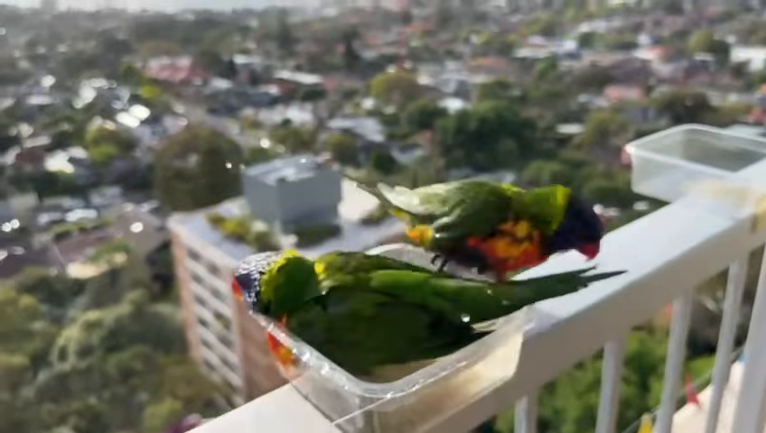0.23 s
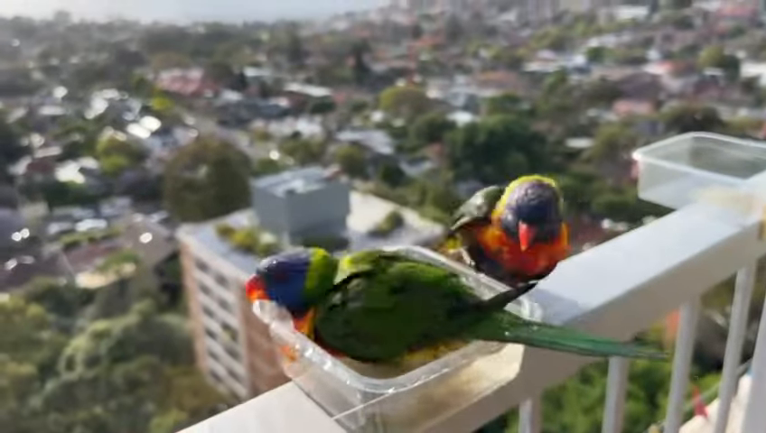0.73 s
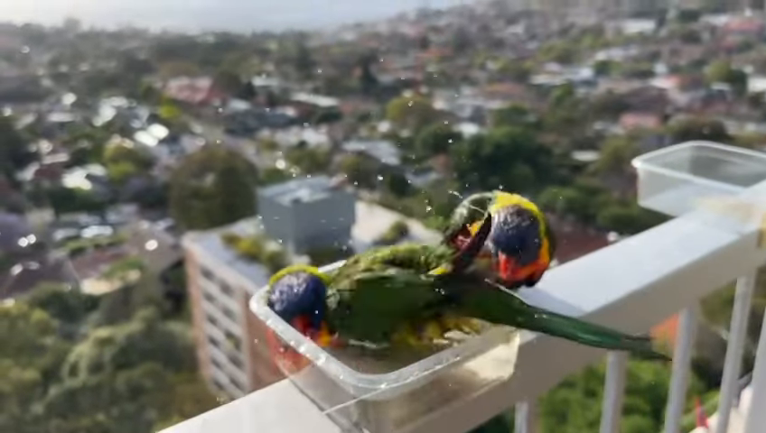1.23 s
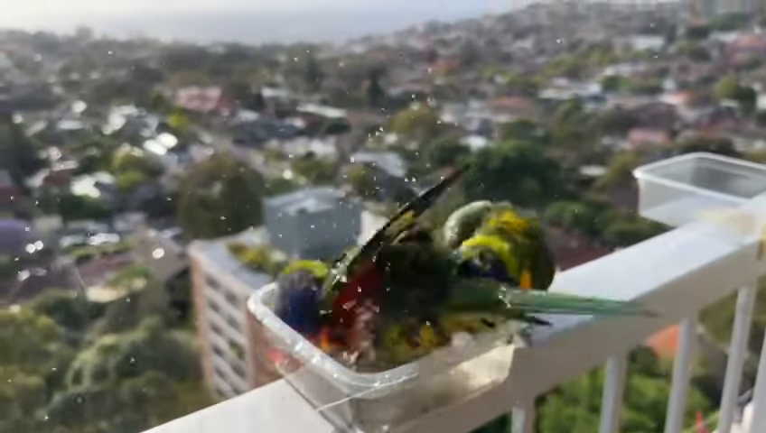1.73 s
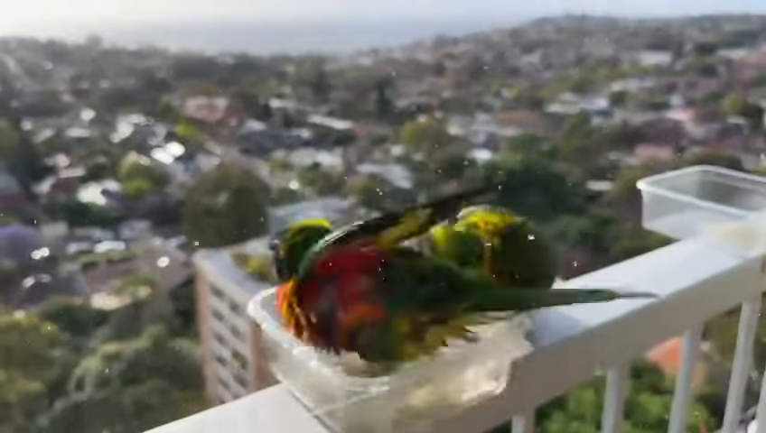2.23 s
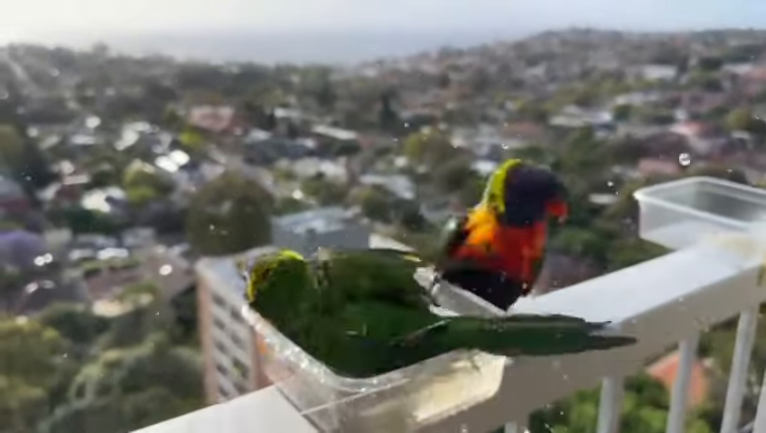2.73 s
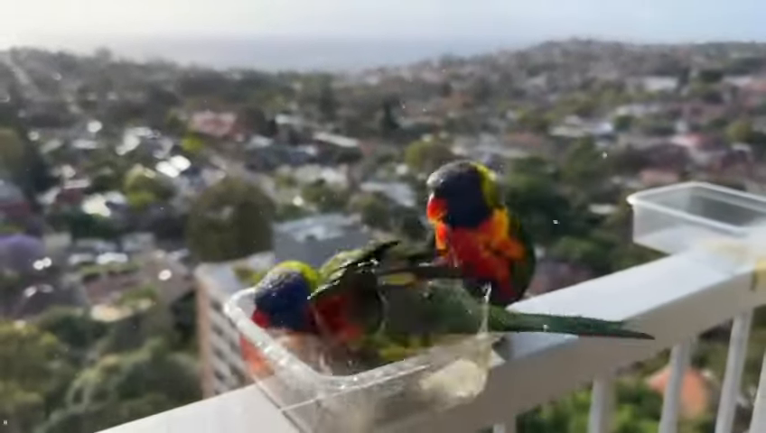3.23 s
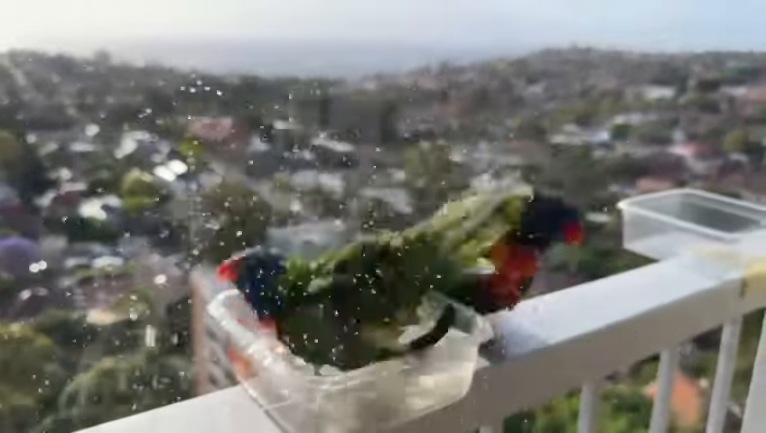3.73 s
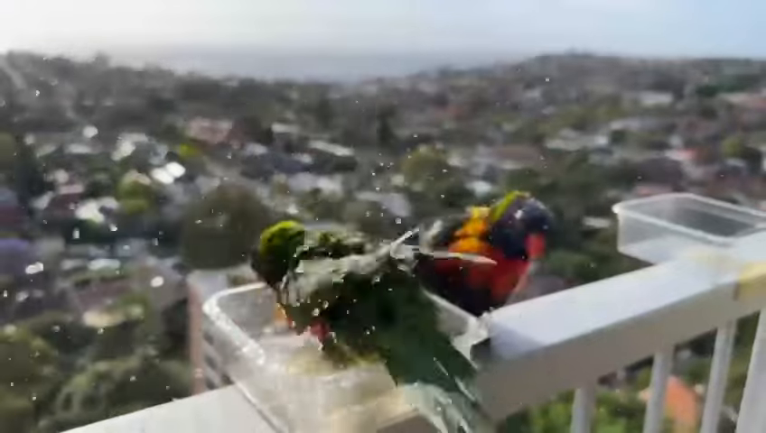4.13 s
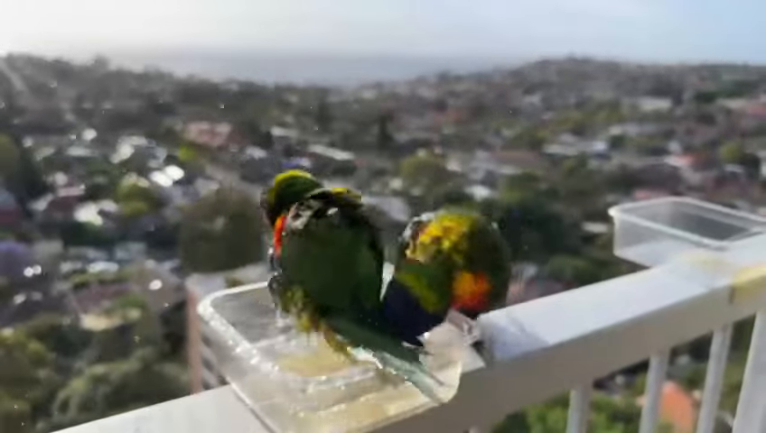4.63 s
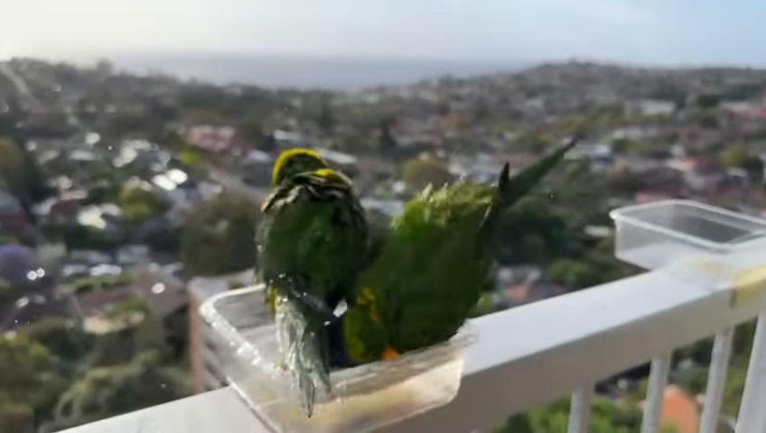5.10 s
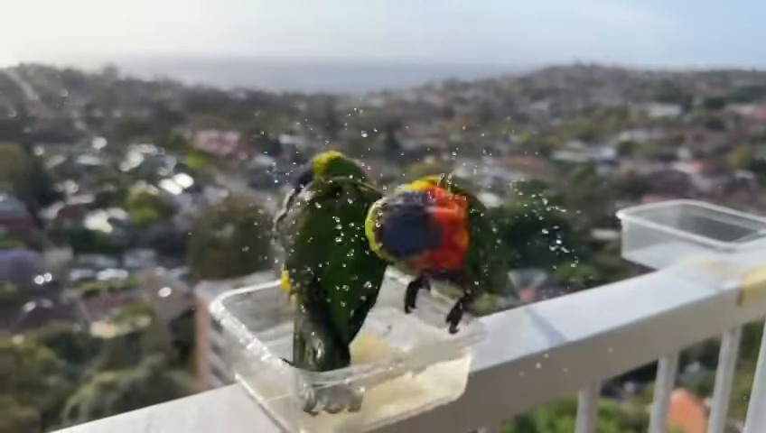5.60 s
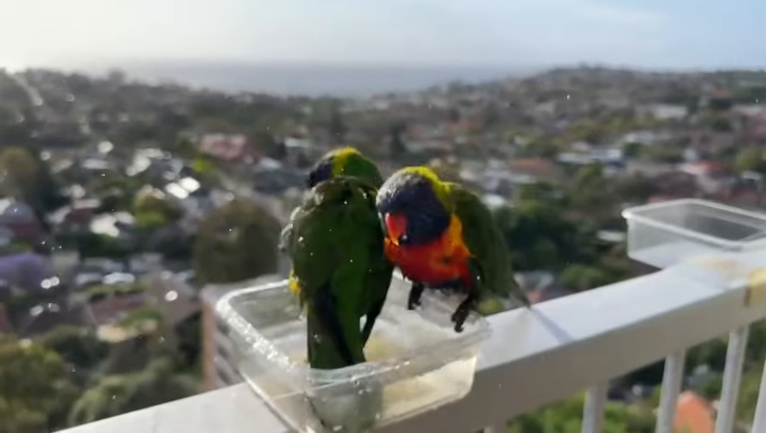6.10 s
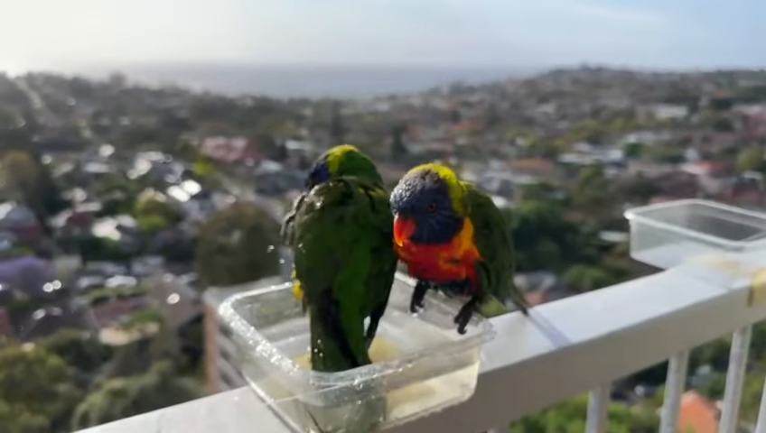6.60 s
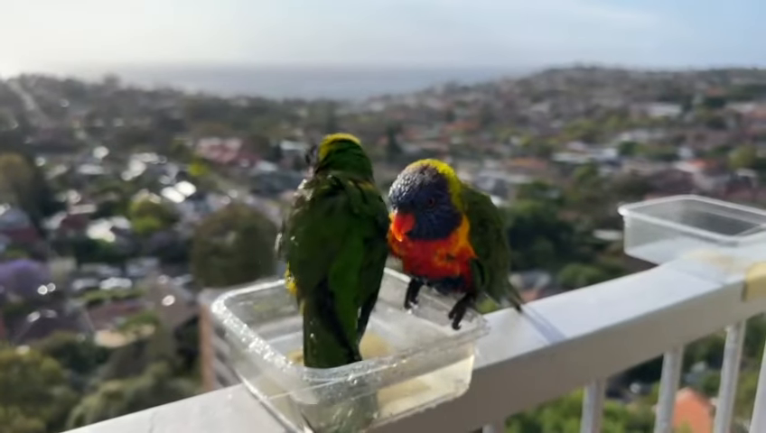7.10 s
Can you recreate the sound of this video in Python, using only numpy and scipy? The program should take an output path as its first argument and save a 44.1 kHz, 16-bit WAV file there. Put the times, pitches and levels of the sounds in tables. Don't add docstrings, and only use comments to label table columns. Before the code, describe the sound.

On an open balcony, parrots bathing in a thin plastic tub give soft raspy chirps, wing slaps and watery patter, then a dense chain of harsh screeches. A brief lower scolding comes after, then tub thuds, drops and gusts bumping the microphone. Faint birds whistle far off, and a final sharp call ends it. Close phone pickup, low distant hum, only a faint tail from nearby walls.

```python
import sys
import numpy as np
from scipy import signal
from scipy.fft import rfft, irfft
from scipy.io import wavfile
from scipy.ndimage import uniform_filter1d, minimum_filter1d

SR = 44100
rng = np.random.default_rng(int(sys.argv[2]) if len(sys.argv) > 2 else 0)


def master(y):
    cut = np.clip(np.atleast_2d(y).T, -1, 1)
    pcm = np.round(cut * 32767)
    wavfile.write(sys.argv[1], SR, pcm.astype(np.int16))


def level_to_linear(level):
    exponent = np.asarray(level, float) / 20
    return 10 ** exponent


N = 324135
T = np.arange(N) / SR

# start_s, length_s, second_partial_db, higher_partials_db, left_minus_right_db
PHRASES = [(.14, .15, -26, -11.5, 2.5), (0.38, .15, -3.5, -17, -0.5), (0.792, .154, -4, -6, -3),
           (.949, 0.053, -15, -15, -8), (1.424, 0.066, -8.5, -16, 1), (1.508, 0.28, -12.5, -17, -0.5),
           (1.689, 0.069, -18.5, -20.5, -1), (2.088, .138, -8.5, -27, -1), (2.237, 0.17, -13.5, -14.5, 4),
           (2.656, .23, -13.5, -13, 3.5), (2.915, .165, -2.5, 0.5, -3), (3.083, .095, -5, -5.5, -0.5),
           (3.174, .207, -5, -3, -2), (3.556, 0.066, -12, -13.5, -3), (3.612, 0.047, -16, -19, -4.5),
           (3.659, 0.084, -9, -45, -4.5), (4.243, .048, -4.5, -7.5, -2), (4.295, .025, -23, -14, -9),
           (4.324, 0.046, -5.5, -11, -1), (4.381, .026, -8, -16, -2), (4.498, .032, -9.5, -9, 4),
           (4.529, .2, -28, -28, 1.5), (7.207, 0.025, -13, -3, 4), (7.237, .14, -9, -10, 5.5)]


def curve(table):
    s, *columns = np.transpose(table)
    return [np.interp(T, s, c) for c in columns]


def unit(x):
    return x / np.sqrt(np.mean(x ** 2, axis=-1, keepdims=True))


def band(x, lo_hz, hi_hz, order=2):
    edges_hz = [lo_hz, min(hi_hz, .45 * SR)]
    return signal.sosfilt(signal.butter(order, edges_hz, "band", fs=SR, output="sos"), x)


def walk(rate_hz):
    hold = max(int(SR / rate_hz), 2)
    steps = np.repeat(rng.standard_normal(N // hold + 1), hold)
    slewed = uniform_filter1d(uniform_filter1d(steps, hold), hold)
    return unit(slewed[:N])


def pair(mid, side, share):
    return np.array([mid + share * side, mid - share * side])


def swell(s, length_s):
    return np.exp(-(2 * (T - s) / length_s) ** 2)


def hum():
    # time_s, level_db
    drone_level = [(0, -24), (.45, -27.5), (.9, -22), (1.15, -26.5), (1.37, -41), (1.62, -23), (2, -27.5),
                   (2.2, -35), (2.7, -31), (2.88, -46), (3.05, -30.5), (3.6, -35.5), (3.8, -46.5),
                   (4.15, -39), (4.4, -51.5), (4.7, -37), (5.1, -42.5), (5.5, -40.5)]
    # time_s, pitch_hz
    drone_pitch = [(2.3, 54.6), (5, 61.15)]
    hz = curve(drone_pitch)[0] * (1 + 0.012 * walk(16))
    level = level_to_linear(curve(drone_level)[0] + 0.48 * walk(3.3))
    return np.sqrt(2) * level * np.sin(2 * np.pi * np.cumsum(hz) / SR)


def town():
    # frequency_hz, level_db per Hz
    colour = [(18, -33), (30, 9.5), (75, -3.5), (187, -12.5), (277, -13), (432, -19.5), (953, -19.5),
              (1900, -32.5), (2210, -31.5), (4520, -50), (7230, -48), (11000, -100), (14300, -130),
              (22000, -120)]
    # time_s, level_db
    loudness = [(0, -41.5), (2.2, -44.5), (4.2, -49.5), (5.5, -46), (7.35, -45.5)]
    murmur = 0
    colour_hz, colour_db = np.transpose(colour)
    for hz in 40 * 2 ** np.arange(0, 8.1, .5):
        noise = rng.standard_normal((2, N))
        mid, side = unit(band(noise, hz * 0.812, hz * 1.138)) * np.sqrt(hz)
        db = np.interp(np.log(hz), np.log(colour_hz), colour_db) + 0.11 * walk(2.2)
        murmur = murmur + level_to_linear(db) * pair(mid, side, np.clip((hz / 1300) ** .5, 0, .8))
    return murmur / np.std(band(murmur, 250, 800)) * level_to_linear(curve(loudness)[0])


def wind():
    # middle_s, length_s, level_db
    gusts = [(1.442, 0.23, -31.5), (2.5, 0.074, -41.5), (5.192, 0.25, -32.5), (5.501, 0.29, -37.5),
             (5.76, 0.13, -34), (5.869, 0.049, -27), (6.124, 0.092, -37.5), (6.404, 0.22, -38),
             (6.534, 0.082, -40), (7.231, .02, -26.5), (7.303, 0.1, -21)]
    # time_s, level_db
    breeze = [
        (0, -49),
        (4.3, -52),
        (5.5, -46),
    ]
    rush_db = 17.5
    eddies = unit(band(band(rng.standard_normal((2, N)), 60, 100, order=1), 22, 270))
    blow = level_to_linear(curve(breeze)[0]) + sum(level_to_linear(db) * swell(s, length) for s, length, db in gusts)
    rush = level_to_linear(rush_db) * blow * unit(band(rng.standard_normal((2, N)), 100, 190))
    return pair(*(eddies + rush), 0.27) * blow * level_to_linear(2 * walk(18))


def splashes():
    # time_s, level_db
    spray = [(0.05, -55.5), (0.62, -69), (0.69, -61), (1.2, -54), (1.33, -57.5), (2.02, -59.5),
             (2.44, -48.5), (2.75, -50), (3.47, -52), (3.96, -56.5), (4.13, -65.5), (4.79, -63.5),
             (4.85, -58), (5.05, -78), (5.3, -63.5), (5.8, -100), (6.75, -99), (6.95, -61.5), (7.15, -68)]
    # start_s, peak_db, tub_knock_db
    slaps = [(0.2277, -33, -31.5), (0.7302, -35.5, -44), (1.092, -34.5, -47), (1.395, -41.5, -46),
             (1.7932, -27.5, -32), (1.8, -35, -29), (1.92, -27, -23), (1.929, -40, -35), (2.0468, -25, -27),
             (2.912, -42.5, -25), (3.7317, -31.5, -55), (3.868, -37, -27), (3.9316, -32.5, -33),
             (4.0022, -34, -30), (4.011, -43, -35), (4.104, -56.5, -57.5), (4.17, -37, -40),
             (4.1886, -39.5, -53), (4.3362, -40, -14.5), (4.481, -43.5, -31), (4.8781, -47, -20),
             (4.973, -26, -30), (4.9796, -43.5, -34.5), (5.0398, -46.5, -13.5)]
    # time_s, peak_db
    ticks = [
        (1.504, -26),
        (2.3294, -24),
        (3.4135, -38),
        (3.7372, -35),
        (4.8254, -50),
        (4.865, -35.5),
        (4.9457, -51),
        (4.9457, -42),
        (6.1376, -53),
        (6.5404, -55),
    ]
    # middle_s, length_s, level_db
    swishes = [
        (0.247, 0.025, -44.5),
        (1.975, 0.029, -41),
        (2.177, 0.024, -36.5),
        (2.376, 0.048, -28.5),
        (2.914, .012, -40.5),
        (3.858, 0.046, -65),
        (4.954, 0.018, -53),
        (5.646, 0.028, -44),
    ]
    # frequency_hz, width_hz, level_db
    tub_modes = [(1240, 457, 9), (1900, 27.3, 3.5), (4000, 4400, -15), (437, 195, -15)]
    knock_rise_s, fizz_db = 0.0029, -9
    crack, knock = np.zeros(N), np.zeros(N)
    u = T[:SR // 5]
    for s, db, knock_db in slaps:
        at = int(s * SR)
        contact, drip = level_to_linear(-60 * u / 0.014), level_to_linear(-14 - 60 * u / 0.0823)
        crack[at:at + len(u)] += level_to_linear(db - 6.5) * (contact + drip)
        knock[at:at + len(u)] += level_to_linear(knock_db + 4.5) * level_to_linear(-60 * u / 0.017) * (1 - np.exp(-u / knock_rise_s))
    for s, db in ticks:
        crack += level_to_linear(db - 6 - 60 * np.abs(T - s) / 0.0064)
    for s, length, db in swishes:
        crack += level_to_linear(db) * swell(s, length)
    drops = rng.standard_normal((2, N)) * level_to_linear(2.9 * rng.exponential(size=N))
    hiss = unit(band(drops, 1900, 16000) + level_to_linear(fizz_db) * band(drops, 8000, 13000))
    knocks = knock * rng.standard_normal(N)
    tub = sum(level_to_linear(db + 2.0) * band(knocks, hz - width / 2, hz + width / 2, order=1)
              for hz, width, db in tub_modes)
    patter = level_to_linear(curve(spray)[0] + 2.2 * walk(14))
    return pair(hiss[0], hiss[1], 0.54) * (crack + patter) + tub


def call_notes():
    # start_s, start_hz, end_hz, level_db
    chatter = [(.14, 1819, 1789, -47.5), (.198, 1844, 1826, -41.5), (.383, 1879, 1863, -38.5),
               (.4, 1860, 1879, -38.5), (.45, 1874, 2001, -38.5), (.495, 2253, 2106, -40),
               (.795, 2424, 2388, -24.5), (.819, 2106, 2050, -21), (.827, 2108, 2075, -32.5),
               (.865, 2238, 2377, -29.5), (.887, 2027, 1956, -29.5), (.915, 2273, 2262, -32),
               (.949, 1768, 1610, -37), (1.424, 1765, 2237, -38.5), (1.442, 2221, 2200, -31.5),
               (1.454, 1973, 1744, -33), (1.466, 1739, 1872, -37.5), (1.5, 2153, 1989, -28.5),
               (1.512, 1971, 1879, -28), (1.544, 1988, 1843, -32), (1.614, 1825, 1820, -35.5),
               (1.688, 1924, 2002, -22.5), (1.706, 2055, 2334, -21), (1.718, 2352, 2615, -27),
               (1.73, 2154, 1609, -34), (2.09, 2010, 1970, -39), (2.14, 2109, 2017, -36.5),
               (2.168, 2154, 2042, -33), (2.186, 2061, 2458, -31), (2.208, 2360, 2140, -36.5),
               (2.236, 1901, 1952, -31), (2.292, 1841, 2013, -36), (2.335, 1901, 2113, -30.5),
               (2.664, 1636, 2040, -38.5), (2.692, 1991, 1832, -33), (2.742, 1846, 2202, -35),
               (2.762, 1810, 1757, -43), (2.794, 1598, 1548, -39), (2.817, 1900, 1765, -34.5),
               (2.834, 1579, 1561, -36), (2.852, 1854, 1803, -32.5), (2.865, 1642, 1518, -39.5)]
    screech = [(2.92, 2456, 2794, -19.5), (2.938, 2391, 2435, -18), (2.944, 2549, 2573, -19),
               (2.986, 2728, 3136, -18.5), (3.004, 2463, 2606, -19.5), (3.024, 2429, 2744, -15.5),
               (3.038, 2883, 2977, -15.5), (3.08, 2511, 2905, -20), (3.1, 2421, 2354, -18),
               (3.129, 2623, 2536, -16), (3.175, 2711, 2589, -17.5), (3.227, 2810, 3102, -17.5),
               (3.236, 3110, 2963, -18.5), (3.243, 2700, 2630, -17.5), (3.269, 2668, 2951, -15),
               (3.281, 2945, 2660, -14.5), (3.291, 2498, 2405, -18.5), (3.318, 2940, 2897, -25),
               (3.332, 2655, 2625, -20), (3.358, 2684, 2803, -21), (3.548, 1701, 1752, -28),
               (3.578, 1804, 1822, -24.5), (3.607, 2819, 3189, -20.5), (3.62, 2614, 2700, -14),
               (3.63, 2717, 2740, -14), (3.648, 2769, 2904, -17), (3.659, 3804, 3805, -10),
               (3.667, 3814, 3779, -10.5), (3.678, 3722, 3730, -24.5), (3.692, 2294, 2577, -21.5),
               (3.697, 2602, 2342, -21.5), (3.701, 3603, 3716, -16), (3.724, 3438, 3308, -32),
               (7.201, 2121, 2397, -23.5), (7.237, 2621, 2437, -17.5), (7.269, 2439, 2478, -19),
               (7.312, 2332, 2065, -17)]
    scold = [(4.248, 1822, 1869, -35.5), (4.282, 1900, 1580, -33.5), (4.296, 3650, 3052, -31),
             (4.322, 1770, 1658, -35), (4.339, 1950, 1827, -28), (4.35, 1906, 2094, -26.5),
             (4.377, 2084, 1930, -30), (4.389, 1912, 1443, -41), (4.494, 1601, 2254, -42.5),
             (4.507, 2317, 2724, -24), (4.527, 2266, 2225, -21), (4.533, 2203, 2083, -22),
             (4.546, 2071, 2016, -23.5), (4.571, 2224, 2310, -17.5), (4.588, 1996, 1978, -24),
             (4.607, 1940, 1799, -25), (4.63, 1933, 1646, -32.5), (4.664, 1773, 1854, -33),
             (4.7, 1730, 1804, -41)]
    scooped = [
        .795,
        3.548,
    ]
    scoop_s, scoop_share, scoop_db = 0.0093, .78, -2
    chain, rows = sorted(chatter + screech + scold), []
    for (s, hz0, hz1, db), (following, *_) in zip(chain, chain[1:] + [(np.inf,)]):
        phrase_ends = [a + length for a, length, *_ in PHRASES if a < s + .009]
        stop = min(following, phrase_ends[-1])
        if np.abs(s - np.array(scooped)).min() < .005:
            rows.append((s, scoop_s, scoop_share * hz0, hz0, db + scoop_db))
            s += scoop_s
        rows.append((s, stop - s, hz0, hz1, db))
    return rows


def syrinx(notes, edge_s):
    release_s = 0.012
    hz, gain, end = np.full(N, 2000.), np.zeros(N), 0
    for (s, length, hz0, hz1, db), (following, *_) in zip(notes, notes[1:] + notes[:1]):
        on = (T >= s) & (T < s + length)
        u = T[on] - s
        hz[on] = hz0 + (hz1 - hz0) * u / length
        rise = .3 + u / edge_s if s - end < .015 else .15 + u / .01
        joined = 0 < following - s < length + .004
        fall = 0.59 + (length - u) / edge_s if joined else (length - u) / release_s
        gain[on] = level_to_linear(db) * np.clip(np.minimum(rise, fall), 0, 1)
        end = s + length
    return uniform_filter1d(hz, size=80), uniform_filter1d(gain, size=50)


def period_doubling(hz, blur):
    # start_s, length_s, half_lines_db re note, lowest_line_extra_db
    doubled = [(0.214, 0.06, -8, 8), (0.383, 0.16, -12, -3), (1.699, 0.046, -12, 5.5), (2.09, 0.1, -8, -6),
               (2.168, 0.057, 1.5, 5), (2.334, 0.091, -11, 2.5), (2.68, .09, -14.5, -10),
               (2.917, 0.069, -25, -10), (2.981, 0.0061, 1.5, -15.5), (3.171, 0.051, -1, -4.5),
               (3.214, .018, -8, -2.5), (3.319, 0.025, -8, -4.5), (3.538, 0.073, 1, -12),
               (3.612, 0.045, -5, -1.5), (4.32, 0.063, -19, 5.5), (4.493, 0.015, -2.5, 9),
               (4.666, .065, -10.5, -19)]
    half_db = -45 + 28.5 * blur
    lowest_db = np.interp(hz, [1750, 2050], [-10, 0])
    for s, length, db, extra_db in doubled:
        on = (T >= s) & (T < s + length)
        half_db[on], lowest_db[on] = db, extra_db
    return half_db, lowest_db


def voice_catches(gain):
    # middle_s, length_s, dip_db, crack_db
    catches = [(0.215, 0.0063, -9, -65), (0.823, .005, -11.5, -42), (0.866, .004, -13, -43),
               (0.89, 0.003, -9, -50), (0.907, 0.0031, -9, -57), (2.685, 0.0048, -12.5, -58),
               (2.733, 0.0098, -10, -60), (2.819, .004, -11.5, -53.5), (2.875, .003, -6.5, -60),
               (2.929, 0.0034, -10, -28.5), (2.976, 0.0056, -8.5, -24), (3.002, 0.0018, -11.5, -32.5),
               (3.031, 0.004, -4.5, -32.5), (3.074, 0.012, -15, -23), (3.127, 0.0022, -8, -19.5),
               (3.175, 0.0079, -17, -30), (3.238, 0.0047, -4, -38), (3.28, 0.0019, -8, -46),
               (3.313, 0.011, -10, -44.5), (3.605, .004, -1.5, -25), (3.623, 0.00096, -3, -41),
               (3.6566, .002, -9, -37.5), (3.678, 0.0079, -26.5, -55), (3.724, 0.0034, -13.5, -54),
               (4.527, 0.0038, 6, -42.5), (4.534, 0.0059, -5, -46), (4.567, 0.0027, -12, -31),
               (4.585, 0.0069, -19, -48), (4.603, 0.0093, -19, -57), (4.625, 0.0053, -11, -55),
               (7.261, 0.0046, -4.5, -45), (7.318, 0.0042, -14, -45)]
    crack = 0
    for s, length, dip_db, crack_db in catches:
        catch = swell(s, length)
        gain = gain * level_to_linear(dip_db * catch)
        crack = crack + level_to_linear(crack_db) * catch
    return gain, crack


def trill(gain, wobble):
    # start_s, length_s, rolls per s, pitch swing share, dip_db
    trills = [(0.197, 0.09, 64, 0.1, 10), (.385, 0.11, 185, 0.16, 8), (.49, .045, 70, .14, 12),
              (1.544, 0.054, 55, 0.09, 6), (1.598, .086, 71, .09, 14), (2.09, .075, 190, .2, 6),
              (2.236, .09, 190, 0.14, 5), (2.335, .07, 150, .14, 6), (3.578, .028, 448, 0.18, 10),
              (.949, .065, 62, .09, 8), (4.632, .09, 85, .06, 12), (7.314, .04, 75, 0.06, 6)]
    for s, length, rate, swing, dip_db in trills:
        roll = (T - s) * rate % 1
        on = (T >= s) & (T < s + length)
        wobble = wobble + on * swing * (.5 - roll)
        gain = gain * level_to_linear(-dip_db * on * (np.cos(np.pi * (roll + 0.11)) ** 2 - 0.472))
    return gain, wobble


def parrots():
    # fourth_partial_db, fifth_partial_db
    sheen = [(-9, -7.5), (11.5, -3), (-3, -0.5), (-6, -8), (8.5, -2), (8.5, 3), (13, 9), (12, -3),
             (-2, -14), (1, -12), (6, -4), (1.5, -8.5), (-3, 1), (-8, 1.5), (-6.5, -0.5), (-1.5, 0.5),
             (-1, -24), (2, 2), (-13, -12), (-14, -6), (4.5, 2), (8, -3.5), (-13, -3), (-1.5, 2)]
    twists = [-0.49, -0.054, -0.71, 0.16, -0.6, -0.27, -0.57, 0.22, -0.21, 0., -0.45, -0.92, 0.27, -1.2,
              -1.7, -0.95, -0.27, -0.2, -0.61, -0.15, -0.69, 0.41, 0.29, 0.094]
    # frequency_hz, level_db
    throat = [(5000, -1), (6000, 5), (7000, -2.5), (8000, 0), (9000, 0), (10500, 0.5), (12500, -22.5)]
    # time_s, share of each line blurred into noise [0-1]
    quaver = [(.3, .45), (.4, .34), (.5, .4), (.8, .14), (1.65, .16), (1.7, .5), (2.15, .58), (2.19, .4),
              (2.4, .52), (2.68, .22), (2.85, .38), (2.92, .14), (3.01, .24), (3.04, .07), (3.26, .08),
              (3.3, .4), (3.335, .25), (3.35, .07), (3.58, .16), (3.645, .26), (3.66, .09), (3.685, .12),
              (3.696, .4), (3.705, .1), (3.73, .3), (4.31, .12), (4.335, .42), (4.36, .14), (4.62, .18),
              (4.7, .45), (7.2, .06)]
    hz, gain = syrinx(call_notes(), edge_s=0.00082)

    starts, _, *posture = np.transpose(np.column_stack([PHRASES, sheen, twists]))
    held = np.array(posture)[:, np.searchsorted(starts[1:], T)]
    db2, upper_db, pan_db, sheen4_db, sheen5_db, twist = uniform_filter1d(held, size=400)
    throat_hz, throat_db = np.transpose(throat)
    db3, db4, db5 = (upper_db + np.interp(k * hz, throat_hz, throat_db) - 4.8 * (k - 3) for k in range(3, 6))

    blur = curve(quaver)[0]
    half_db, lowest_db = period_doubling(hz, blur)
    gain, crack = voice_catches(gain)
    jump = uniform_filter1d(np.abs(np.gradient(np.log(hz))), size=170) * 170
    jump *= minimum_filter1d(gain, size=400) > 0
    rasp = np.minimum(level_to_linear(-26 + 25.5 * blur) + np.clip(8 * (jump - .05), 0, .5), 1.2)
    gain, wobble = trill(gain, .004 * walk(140) + .05 * blur * walk(600))
    phase = 2 * np.pi * np.cumsum(hz * (1 + uniform_filter1d(wobble, size=30))) / SR
    half_gain = gain * uniform_filter1d(level_to_linear(half_db), size=100)

    tops_db = [0 * T, db2, db3, db4 + sheen4_db, db5 + sheen5_db]
    halves_db = [lowest_db, 0 * T - 2.5, 0.2 * db2 - 6, 0.52 * db3 - 6, db4 - 5.5]
    lean = [0.96, 0.16, 1.0, .1, .1]
    turned = np.multiply.outer([0.33, 1., .6, .1, .1], np.array([twist, -twist]) / 2)

    breath = gain * level_to_linear(-24.5 + 11 * blur)
    air = unit(band(rng.standard_normal((2, N)), 1200, 8700))
    out = (crack + breath) * pair(*air, .5)
    for k in range(5):
        share = np.minimum(blur * (1 + .8 * k), 1)
        shake = np.sqrt(1 - share ** 2) * level_to_linear(1.1 * walk(70)) + share * walk(1300)
        shake = (shake + rasp * np.tanh(walk(1600))) / np.sqrt(1 + rasp ** 2)
        fits = hz * (k + 1) < 12500
        whole = gain * level_to_linear(tops_db[k]) * np.sin((k + 1) * phase + turned[k]) * fits
        halved = half_gain * level_to_linear(halves_db[k]) * np.sin((k + .5) * phase + turned[k])
        pan = level_to_linear(lean[k] * np.array([pan_db, -pan_db]) / 2)
        out += np.sqrt(2) * shake * (whole + halved) * pan
    return out


def far_birds():
    # start_s, length_s, start_hz, end_hz, level_db
    whistles = [(.915, .036, 1800, 1720, -35), (1.0, .2, 4750, 4650, -62), (2.555, .095, 4600, 4550, -57),
                (3.172, .048, 2080, 1950, -27), (4.925, .018, 950, 1050, -46),
                (4.936, .02, 2050, 1950, -46), (4.958, .016, 1600, 1620, -43),
                (6.455, .04, 3000, 2550, -53), (6.82, .05, 3100, 2800, -54), (7.158, .01, 2900, 3000, -53),
                (7.171, .011, 3050, 2900, -48), (7.183, .009, 2850, 2900, -49)]
    hz, gain = syrinx(whistles, edge_s=0.005)
    phase = 2 * np.pi * np.cumsum(hz * (1 + .012 * walk(200))) / SR
    return gain * level_to_linear(3 * walk(150)) * np.sin(phase)


def walls(near):
    t60_s, late_t60_s, level_db, late_db = 0.05, 0.19, -10.5, -13.5
    u = T[:SR // 2]
    decay = level_to_linear(-60 * u / t60_s) + level_to_linear(late_db - 60 * u / late_t60_s)
    diffuse = rng.standard_normal((2, len(u))) * decay * (u > .008)
    tail = unit(diffuse) / np.sqrt(len(u))
    return level_to_linear(level_db) * signal.fftconvolve(near.mean(axis=0, keepdims=True), tail, axes=1)[:, :N]


def two_ports(near):
    # frequency_hz, left lead [radians], left_minus_right_db
    ports = [(1500, 0.5, 1), (2700, 0.9, -3.5), (5200, 2.18, -1.5), (6100, 1.5, 0.5), (7670, 5, 2.5),
             (8034, 4, 3.5), (9490, 8, -0.5), (9940, 10, -0.5)]
    notch_hz, notch_width_hz, notch_db = 7440, 500, -3
    port_hz, lead, lean_db = np.transpose(ports)
    bins = np.fft.rfftfreq(N, 1 / SR)
    turn = np.exp(.5j * np.interp(bins, port_hz, lead)) * level_to_linear(np.interp(bins, port_hz, lean_db) / 2)
    notch = level_to_linear(notch_db * np.exp(-((bins - notch_hz) / notch_width_hz) ** 2))
    return irfft(rfft(near) * np.array([turn, 1 / turn]) * notch, N)


def scene():
    near = parrots() + splashes()
    return two_ports(near) + walls(near) + far_birds() + hum() + wind() + town()


def top_cut(x):
    return signal.sosfilt(signal.butter(12, 12220, fs=SR, output="sos"), x)


def record(dry):
    wet = band(band(dry, 38, 10000, order=3), 42.3, 11200, order=4)
    rounded = np.tanh(wet / 2) * 2
    return top_cut(rounded)


dry = scene()
out = record(dry)
master(out)
```